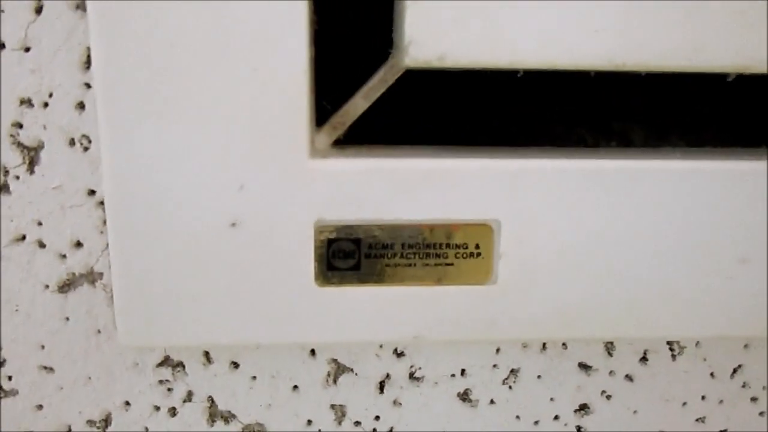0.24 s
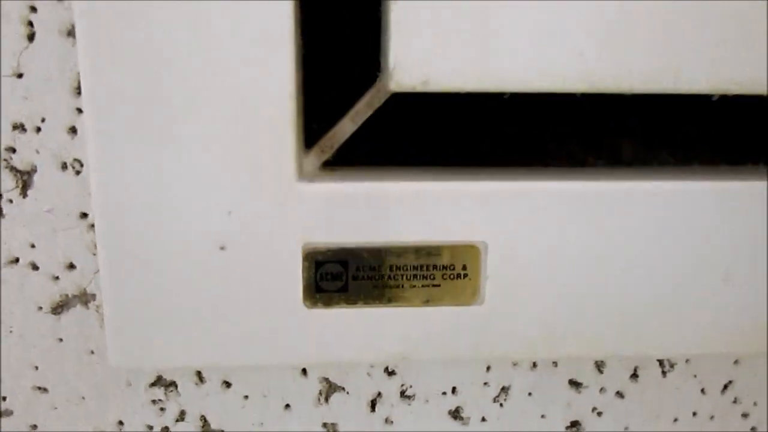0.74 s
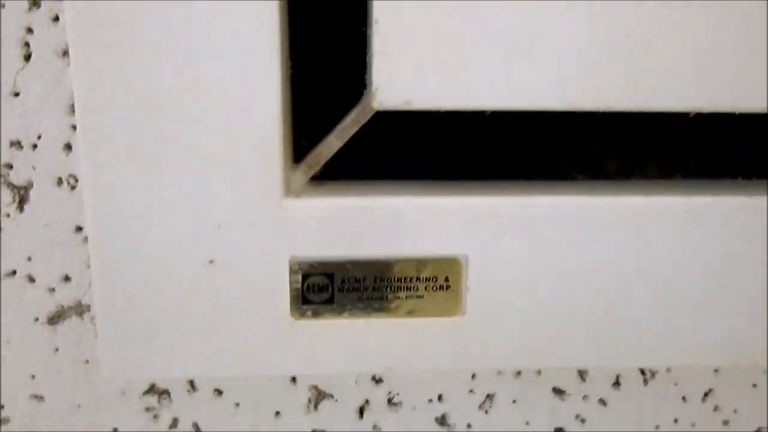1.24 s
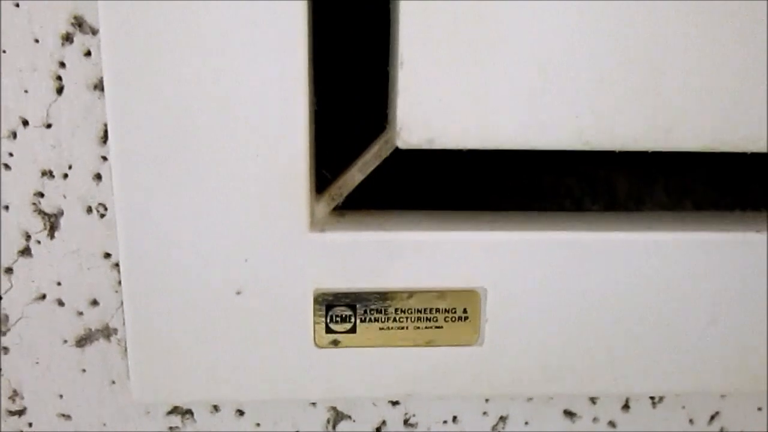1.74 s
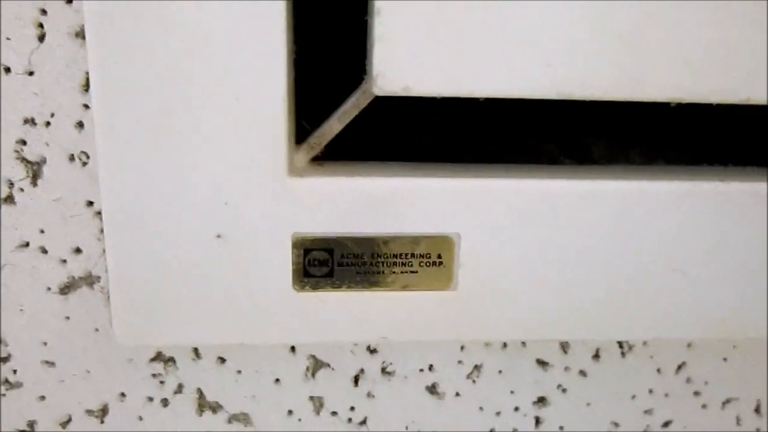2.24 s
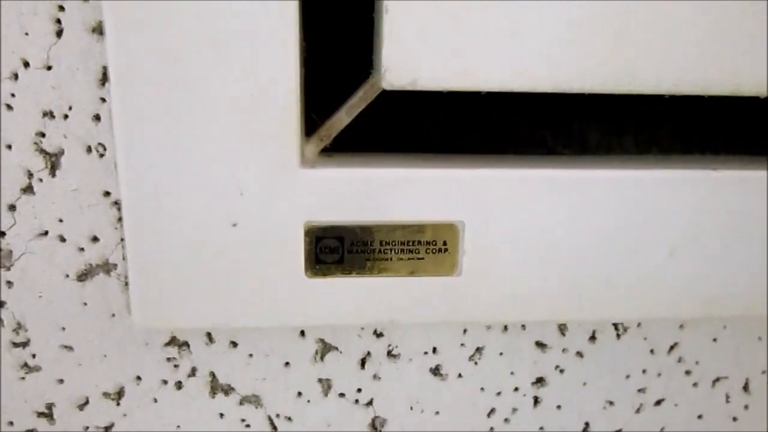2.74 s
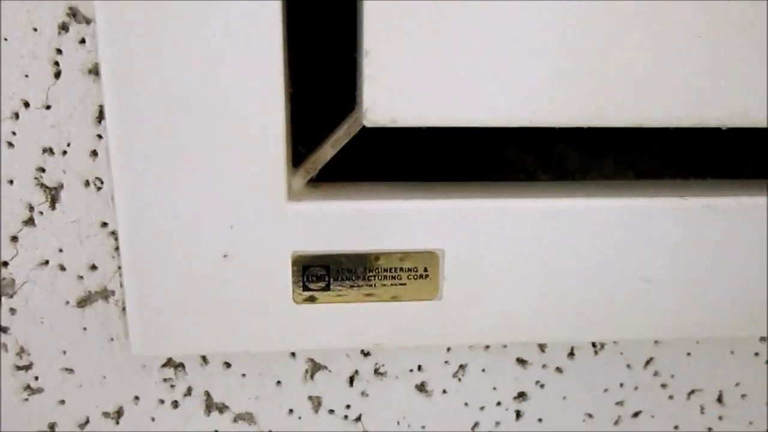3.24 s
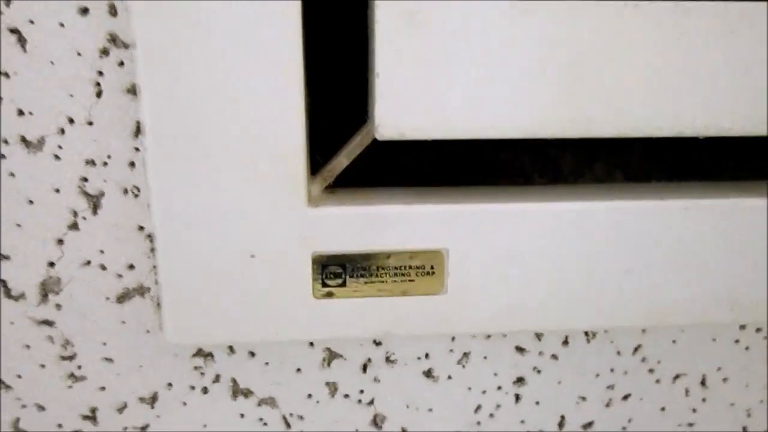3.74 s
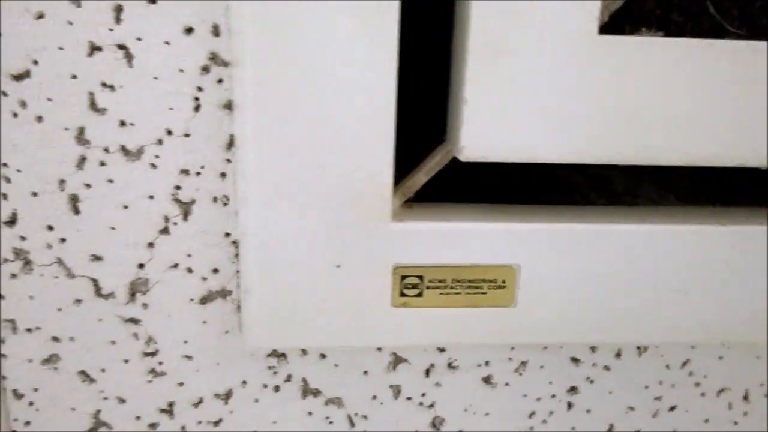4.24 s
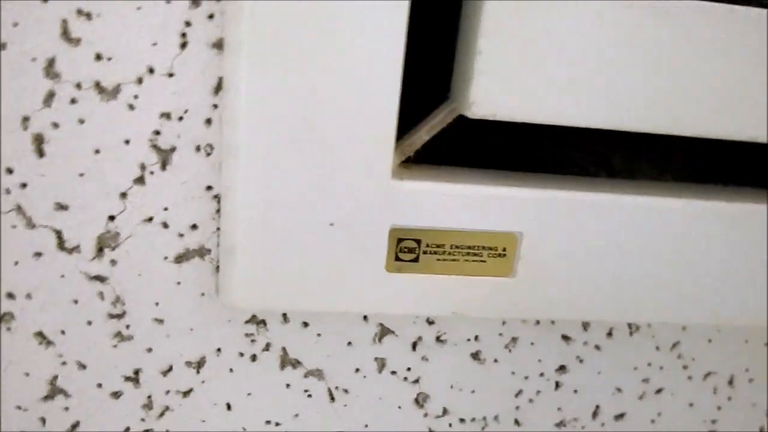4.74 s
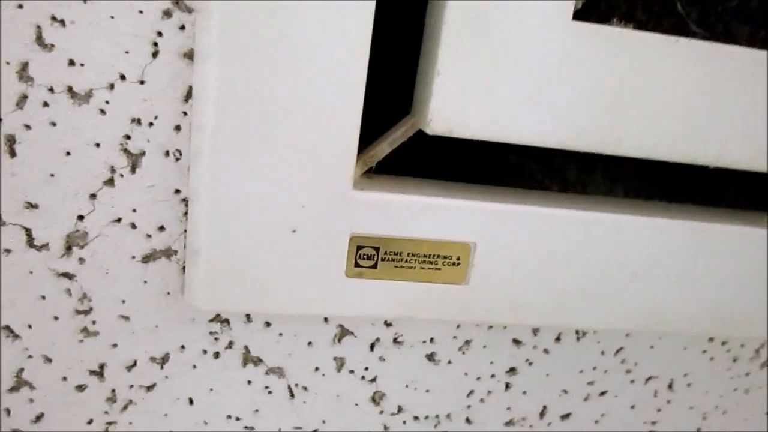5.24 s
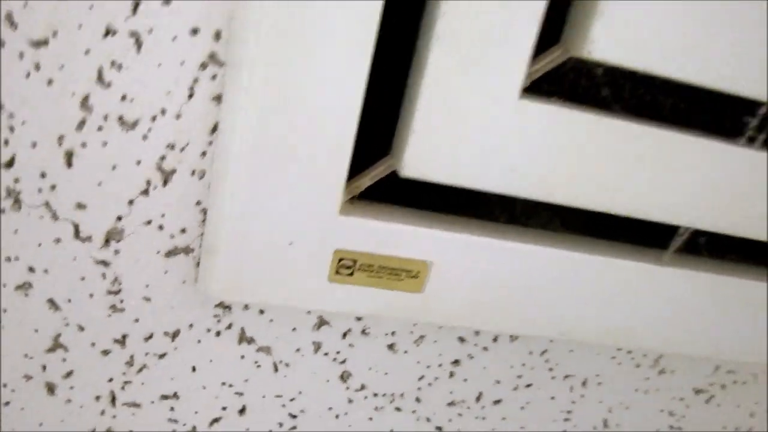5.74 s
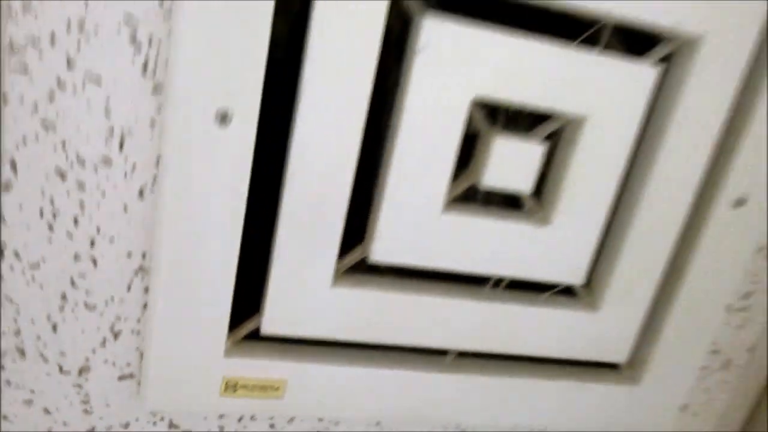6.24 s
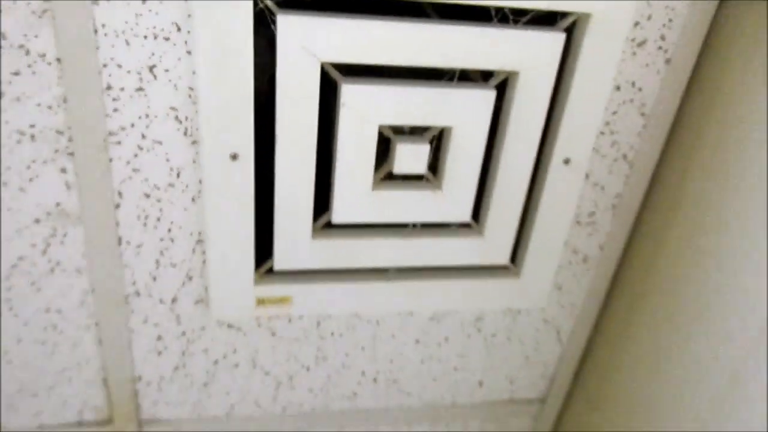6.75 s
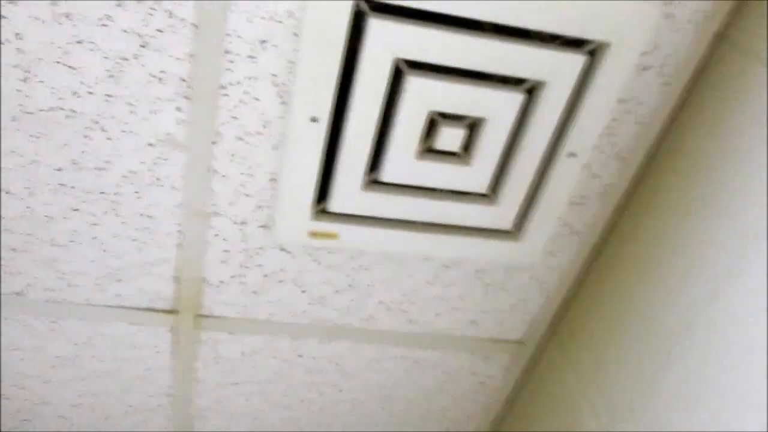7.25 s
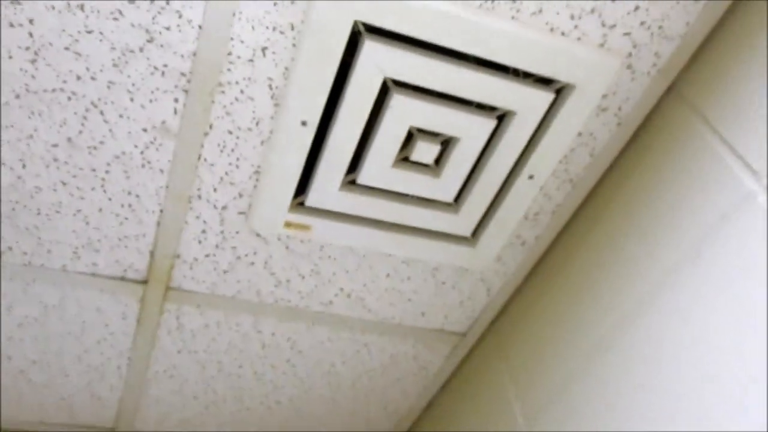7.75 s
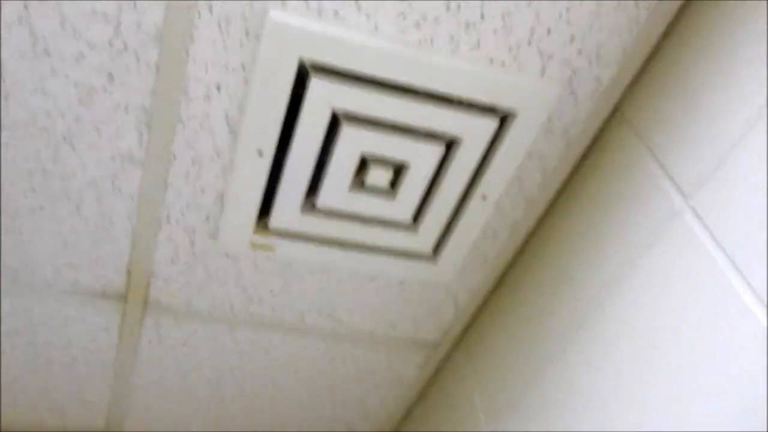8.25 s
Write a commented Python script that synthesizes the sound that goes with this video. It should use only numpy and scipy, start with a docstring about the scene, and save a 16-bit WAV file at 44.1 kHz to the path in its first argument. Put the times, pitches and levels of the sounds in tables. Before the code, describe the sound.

Steady mains-like fan drone and duct air with a light scraping flutter, briefly rougher midway, followed by bumps and sharp plastic clicks.

```python
"""Ceiling exhaust fan

A mains hum with sidebands from the turning rotor sits over filtered-noise air in the duct and grille.
A housing buzz pulses on top, and a faint noise rub swells about twice a turn and sometimes catches.
The camera backs away around six seconds: tones and noise layers shift from grille to room levels.
Fingers brush its case as shaped noise and click on it as resonant snaps.
The loudest click ducks the gain for about a second."""
import sys
import numpy as np
from scipy import signal
from scipy.fft import rfft, irfft, next_fast_len
from scipy.io import wavfile
from scipy.ndimage import uniform_filter1d, minimum_filter1d, map_coordinates

SR = 44100
rng = np.random.default_rng(int(sys.argv[2]) if len(sys.argv) > 2 else 0)


def wrap_up_sound(samples):
    """Save the sound to the file named by the first command line argument, as 16-bit audio."""
    columns = np.atleast_2d(samples).T
    # keep every value between -1 and 1, then stretch to whole-number steps
    tamed = np.clip(columns, -1, 1)
    steps = np.round(tamed * 32767).astype(np.int16)
    wavfile.write(sys.argv[1], SR, steps)


N = 374850


def amp(db):
    """Decibels to gain."""
    return 10 ** (np.asarray(db) / 20)


def unit(x):
    """Scale to rms 1."""
    return x / np.sqrt(np.mean(x ** 2) + 1e-20)


def clock():
    """The time of every sample, in seconds."""
    return np.arange(N) / SR


def curve(rows):
    """Interpolate (t/s, value) rows to one value per sample."""
    times, values = np.transpose(rows)
    return np.interp(clock(), times, values)


def wobble(rate):
    """A smooth random curve, rate knots a second."""
    knots = rng.standard_normal(1024)
    return map_coordinates(knots, [clock() * rate], mode="mirror")


def bell(x):
    """A Gaussian hump of height 1."""
    return np.exp(-.5 * x ** 2)


def shape(points, hz, tilt_db=0):
    """Gain of (f/Hz, level/dB) points on a log axis, tilted in dB per octave."""
    f, db = np.transpose(points)
    octave = np.log2(np.maximum(hz, 1))
    # the tilt pivots on the last point and stays flat below the second
    tilt = tilt_db * (np.clip(octave, np.log2(f[1]), None) - np.log2(f[-1]))
    return amp(np.interp(octave, np.log2(f), db) + tilt)


def bump(hz, centre_hz, db, octaves=0.12):
    """Gain of a broad resonance that lifts one band, or dips it if db is negative."""
    return amp(db * bell(np.log2(np.maximum(hz, 1) / centre_hz) / octaves))


def filtered(x, response):
    """Multiply the spectrum of x by a response of frequency."""
    m = next_fast_len(N + SR // 2)
    return irfft(rfft(x, m) * response(np.fft.rfftfreq(m, 1 / SR)), m)[:N]


def noise(points):
    """Coloured noise of rms 1."""
    return unit(filtered(rng.standard_normal(N), lambda hz: shape(points, hz)))


# rotor speed: t/s, f/Hz (turns per second)
ROTOR_SPEED = [(0, 25.77), (1.1, 25.77), (1.5, 25.9), (2.4, 25.88), (4, 25.84), (5, 25.81), (6.5, 25.78),
               (8.5, 25.77)]


def rotor_turns():
    """Turns completed by the rotor: its speed summed over time."""
    return np.cumsum(curve(ROTOR_SPEED)) / SR


# slow drift of the deep drone: t/s, level/dB (only the departure from its mean is used)
DRONE_DRIFT = [(0.0, -14.5), (0.04, -15), (1.16, -15), (3.73, -15.5), (5.69, -17), (7.05, -14)]


def drone_drift():
    """Slow rise and fall of the deep tones, in dB around their mean."""
    drone_db = curve(DRONE_DRIFT)
    return drone_db - drone_db.mean()


MAGNET_HZ = 120.04  # rate of the magnetic pull
# motor tones before drift and standing waves:
# multiple of the magnetic pull, added multiple of rotor speed, level/dB at the grille, level/dB in the room
MOTOR_TONES = [(0, 1, -39.5, -42), (0, 2, -44.5, -57), (0, 3, -32.5, -37), (0, 5, -63, -50),
               (0, 6, -46.5, -55), (0, 8, -40.5, -44.5), (0, 10, -47, -50), (1, -2, -46, -48),
               (1, -1, -41.5, -50.5), (1, 0, -15.5, -17), (1, 1, -35.5, -62), (1, 2, -67, -47),
               (1, 5, -44, -54), (2, -1, -42, -37), (2, 0, -27, -37), (2, 1, -33.5, -45.5),
               (2, 2, -45, -46.5), (2, 3, -37.5, -47.5), (2, 4, -47.5, -44.5), (2, 5, -44, -43.5),
               (3, -4, -38.5, -53), (3, -2, -36, -45.5), (3, -1, -39, -55), (3, 0, -45, -48),
               (3, 1, -40.5, -54), (3, 2, -41, -41.5), (4, -1, -42, -52.5), (4, 3, -48.5, -56)]
# standing waves that the camera passes on its way back: distance (0-1), f/Hz, level/dB
ROOM_WAVES = [(0.54, 312, 6.5), (0.35, 208, 1.5), (0.64, 350, -5.5)]
WAVE_REACH = .2  # spread to either side, in the same distance


def hum(turn, away, drift_db, duct_db, waver_db=0.3):
    """The magnetic pull shakes the housing; the off-centre rotor adds sidebands to each harmonic."""
    t, out = clock(), np.zeros(N)
    mid_db = duct_db + waver_db * wobble(4.5)
    waves = [(bell((away - place) / WAVE_REACH), hz, db) for place, hz, db in ROOM_WAVES]
    phases = rng.random(len(MOTOR_TONES))
    for (pull, spin, near_db, far_db), phase in zip(MOTOR_TONES, phases):
        cycles = round(pull) * MAGNET_HZ * t + round(spin) * turn
        hz = cycles[-1] / t[-1]
        tone_db = near_db + (far_db - near_db) * away
        tone_db = tone_db + (drift_db if hz < 160 else mid_db)
        for inside, wave_hz, wave_db in waves:
            tone_db = tone_db + inside * 20 * np.log10(bump(hz, wave_hz, wave_db, octaves=0.086))
        out += amp(tone_db) * np.sin(2 * np.pi * (cycles + phase))
    return np.sqrt(2) * out  # so tone levels are rms


# colour of the housing's chatter: f/Hz, relative level/dB
BUZZ_COLOUR = [(300, -40), (480, 0.5), (570, 1.5), (690, 0.5), (780, -3), (900, 2.5), (1100, -20.5),
               (1370, -1.5), (1550, -38), (1950, -4.5), (3000, -28), (6000, -49)]


def buzz(turn, sharpness=4.4, t60=0.15):
    """The housing chatters on the magnetic pulses, hardest once a turn, and rings in the duct."""
    pulses = np.maximum(np.cos(2 * np.pi * MAGNET_HZ * clock()), 0) ** 200
    blows = pulses * np.exp(sharpness * np.cos(2 * np.pi * turn))
    t = np.arange(SR // 4) / SR
    echo = rng.standard_normal(len(t)) * amp(-60 * t / t60)
    ringing = signal.fftconvolve(blows, echo)[:N]
    return unit(filtered(ringing, lambda hz: shape(BUZZ_COLOUR, hz)))


# colours of the duct up close, the room and the grille hiss: f/Hz, relative level/dB
DUCT_COLOUR = [(15, -31), (35, -10), (55, -16), (110, 1), (150, 1), (255, -2), (330, -2), (400, -16.5),
               (445, 1.5), (490, -9), (650, -0.5), (770, -9.5), (930, -12.5), (1150, -19), (2500, -55)]
ROOM_COLOUR = [(15, -23), (45, -18), (70, -9), (150, 1), (220, 4.5), (290, -5.5), (410, -7), (470, -2.5),
               (620, -6), (780, -10), (980, -10.5), (1150, -16.5), (2500, -41.5)]
HISS_COLOUR = [(300, -25), (1000, -2.5), (1350, 1.5), (1550, -1), (1930, 0), (2350, -3.5), (2750, -3),
               (3600, -7.5), (4800, -10), (7300, -17), (9500, -20), (11000, -28.5), (13000, -27),
               (15000, -33)]


def air(turn, room_share, duct_db, hiss_db, rush_db=-30, room_db=-34, grille_db=-44, throb=0.07):
    """Turbulence roars in the duct; its hiss through the grille swells slightly with each turn."""
    direct = np.sqrt(1 - room_share) * amp(rush_db) * noise(DUCT_COLOUR)
    room = np.sqrt(room_share) * amp(room_db) * noise(ROOM_COLOUR)
    hiss = noise(HISS_COLOUR) * amp(grille_db + hiss_db + 0.17 * wobble(3.6))
    return (direct + room) * amp(duct_db) + hiss * (1 + throb * np.cos(2 * np.pi * (turn - .1)))


# where the rotor touches: place in the turn (turns), width (turns), relative level/dB
RUB_CONTACTS = [(0.89, 0.041, 9.5), (1.03, .07, 5), (0.22, 0.066, 12.5), (0.31, 0.13, -23)]
# colours of the rub's four parts: f/Hz, relative level/dB
SCRAPE_COLOUR = [(700, -21), (1950, -1), (2400, -2.5), (3600, -1), (4800, -1), (5650, 3.5), (6700, 0),
                 (7250, -9), (8400, 2), (9600, -5.5), (10900, -9.5), (12100, -3), (14000, -9.5),
                 (15500, -17)]
TICK_COLOUR = [(1500, -18), (3500, -8.5), (4900, -11.5), (5400, -1), (5900, -8.5), (6400, -9), (7300, -27),
               (8400, -11), (10000, -18), (15000, -43)]
RING_COLOUR = [(3600, -33), (4150, -21), (4320, 9), (4500, -7), (5000, -32), (11300, -52), (11800, -12),
               (12200, -38)]
WHIRR_COLOUR = [(1500, -12), (1750, 8), (1960, 8), (2150, -40), (2450, -7), (2700, -3.5), (3000, -13),
                (3600, -17.5)]
# base levels of the parts: level/dB at the grille, gain/dB in the surge, loss/dB out in the room
SCRAPE_MIX = (-52.5, 2.1, 12)
TICK_MIX = (-55.5, 4.3, 18)
WHIRR_MIX = (-59.5, 14.4, 0.5)
# the thin metal's ring holds, then dies away
RING_DB, RING_FADES_AT_S, RING_FADE_DB_PER_S = -58, 3.1, 3


def rub(turn, away, chatter=0.39, tick_place=0.863, tick_width=0.037, tick_sharpness=2.1,
        ring_depth=1.0, whirr_depth=0.39, accent_db=1.6):
    """The rotor grazes about twice a turn, ticking where a touch meets a magnetic pulse; thin metal rings on."""
    lean = surge()

    def part_db(mix):
        base_db, surge_db, loss_db = mix
        return base_db + surge_db * lean - loss_db * away

    def touch(place, width):
        return bell(((turn - place + .5) % 1 - .5) / width)

    pull = np.cos(2 * np.pi * (MAGNET_HZ * clock() - .36))
    contact = sum(amp(db) * touch(place, width) for place, width, db in RUB_CONTACTS)
    pressure = contact * (1 + chatter * pull) * amp(wobble(28))
    scrape = amp(part_db(SCRAPE_MIX)) * unit(pressure) * noise(SCRAPE_COLOUR)

    tick_force = unit(touch(tick_place, tick_width) * np.exp(tick_sharpness * pull))
    tick = amp(part_db(TICK_MIX) + accent_db * wobble(26)) * tick_force * noise(TICK_COLOUR)

    swing = np.cos(2 * np.pi * (turn - .18))
    ring_db = RING_DB - RING_FADE_DB_PER_S * np.maximum(clock() - RING_FADES_AT_S, 0)
    ring = amp(ring_db) * (1 + ring_depth * swing) * noise(RING_COLOUR)
    whirr_gain = amp(part_db(WHIRR_MIX) + accent_db * wobble(26))
    whirr = whirr_gain * (1 + whirr_depth * swing) * noise(WHIRR_COLOUR)
    return scrape + tick + ring + whirr


# the rotor catches, then more lightly on the next turns: t/s, level/dB, loss per turn/dB
ROTOR_CATCHES = [(0.852, -38.5, 10), (2.949, -36.5, 7), (3.026, -38, 3), (3.374, -29.5, 3.5),
                 (4.03, -38, 5)]


def grazes(length=0.0016, count=6):
    """Now and then the rotor catches for a few milliseconds, once a turn for count turns."""
    t, catches = clock(), np.zeros(N)
    for s, db, loss_db in ROTOR_CATCHES:
        period = 1 / np.interp(s, *np.transpose(ROTOR_SPEED))
        turns = np.clip(np.round((t - s) / period), 0, count - 1)
        catches += amp(db - loss_db * turns) * bell((t - s - turns * period) / length)
    return catches * noise(SCRAPE_COLOUR)


# the rotor leans harder into its rub for a moment
SURGE_AT_S, SURGE_RISE_S, SURGE_FALL_S = 3.47, .11, .75


def surge():
    """Extra pressure on the rub, 0-1: it builds quickly and eases off slowly."""
    late = clock() - SURGE_AT_S
    return np.where(late < 0, bell(late / SURGE_RISE_S), np.exp(-np.abs(late) / SURGE_FALL_S))


# the camera backs away: t/s, distance from the grille (0-1)
CAMERA_PATH = [(0, 0), (5.85, .04), (6.65, 0.61), (7.05, 0.72), (7.35, 0.9), (8.5, 1)]


def camera_distance():
    """Distance of the camera from the grille, 0-1, which sets each layer's near and far balance."""
    return np.clip(curve(CAMERA_PATH), 0, 1)


# colour of skin on the case: f/Hz, relative level/dB
SKIN_COLOUR = [(100, -21), (600, 4), (1100, 8), (2000, 0), (4000, 1), (6000, -4), (9500, -1), (11500, -16),
               (15000, -17)]
# fingers sliding on the case: t/s, rise/s, fall/s, level/dB, rasp centre f/Hz, rasp boost/dB
FINGER_BRUSHES = [(6.085, 0.0026, 0.0043, -32, 4500, 3), (6.136, 0.017, 0.016, -31, 1160, 6.5),
                  (6.144, 0.0064, 0.0042, -21, 7840, 15), (6.405, 0.039, 0.025, -48.5, 10900, 18),
                  (6.8, 0.91, 0.82, -51, 5000, 1), (7.1, 0.017, 0.1, -46.5, 2600, 11),
                  (7.212, 0.014, 0.019, -40.5, 7060, 11), (7.256, 0.0034, 0.0032, -25, 1240, 15),
                  (7.258, 0.011, 0.017, -38, 4480, 8), (7.91, 0.033, 0.026, -47.5, 2140, 21),
                  (8.365, .04, 0.053, -50.5, 8000, 8)]
# the hand bumps the camera: t/s, half length/s, level/dB (the peak comes out 4.3 dB lower)
CAMERA_BUMPS = [(6.148, 0.002, -10), (7.257, .004, -29.5)]


def brushes(grain_db=4.5):
    """Skin drags grainily over the case; a bump pushes the microphone once down and up."""
    t, out = clock(), np.zeros(N)
    roughness = unit(uniform_filter1d(rng.standard_normal(N), size=60))
    skin = unit(amp(grain_db * roughness)) * noise(SKIN_COLOUR)
    for s, rise, fall, db, rasp_hz, rasp_db in FINGER_BRUSHES:
        stroke = bell((t - s) / np.where(t < s, rise, fall))
        out += amp(db) * stroke * unit(filtered(skin, lambda hz: bump(hz, rasp_hz, rasp_db)))
    for s, length, db in CAMERA_BUMPS:
        u = (t - s) / length
        out += amp(db) * u * bell(u)
    return out


# colour of the plastic case: f/Hz, relative level/dB
CASE_COLOUR = [(200, -26), (800, -3), (1300, 2.5), (2400, 1), (4800, -3), (8000, -5.5), (11000, -11),
               (15000, -15.5)]
# the case ticks under the grip: t/s, peak level/dB before gain control, centre f/Hz, brightness/dB per octave
CASE_CLICKS = [(6.4565, -19.5, 8000, 4), (6.542, -17, 3500, -6.5), (6.955, -5.5, 1780, 1.5),
               (7.0765, -25.5, 2800, -2), (7.1223, 3, 5100, 1), (7.2457, -19, 1700, -6),
               (7.2548, -9, 4520, 0.5), (7.3141, -1.5, 11100, 2), (7.3304, -17.5, 7500, -1),
               (7.519, -14.5, 6000, 0), (7.653, -23, 1700, -10), (7.9965, -23, 6470, 6),
               (8.369, -20.5, 5950, 1), (8.39, -19.5, 6500, 3)]


def clicks(tail_db=-16, tail_t60=0.0081, ring_db=7.0, ring_octaves=0.19):
    """Each tick is one sharp snap in the plastic, followed by a few milliseconds of rattle."""
    t, out = np.arange(2048) / SR, np.zeros(N + SR)
    hz = np.fft.rfftfreq(len(t), 1 / SR)
    causal = 1 + np.sign(np.fft.fftfreq(len(t)))
    for s, db, centre_hz, bright_db in CASE_CLICKS:
        colour = shape(CASE_COLOUR, hz, bright_db) * bump(hz, centre_hz, ring_db, ring_octaves)
        # minimum phase: the case rings only after it is struck
        case = np.exp(rfft(causal * irfft(np.log(colour))))
        snap = amp(tail_db - 60 * t / tail_t60) * rng.standard_normal(len(t))
        snap[0] = 1
        crack = irfft(rfft(snap) * case)
        out[round(s * SR):][:len(t)] += amp(db) * crack / np.abs(crack).max()
    return out[:N]


DUCT_FOLLOWS = .45  # share of the drone's drift in the duct's sound
ROOM_TAKES_OVER = 0.61  # distance at which the room has replaced the duct's direct sound
HISS_LOSS_DB = 6.5  # from the grille to out in the room
BUZZ_DB, BUZZ_LOSS_DB = -40.5, 6.5  # at the grille; lost once the room takes over


def scene():
    """The fan overhead and the hand on the camera."""
    turn = rotor_turns()
    away = camera_distance()
    room_share = np.clip(away / ROOM_TAKES_OVER, 0, 1)
    drift_db = drone_drift()
    duct_db = DUCT_FOLLOWS * drift_db
    chatter = amp(BUZZ_DB + duct_db - BUZZ_LOSS_DB * room_share) * buzz(turn)
    motor = hum(turn, away, drift_db, duct_db) + chatter + rub(turn, away) + grazes()
    airflow = air(turn, room_share, duct_db, -HISS_LOSS_DB * away)
    return (motor + airflow + brushes() + clicks())[None]


def gain_control(x, ceiling_db=-0.5, hold=0.19, recovery_db=4.5):
    """A sharp peak over the ceiling cuts the gain at once; it holds, then climbs back in dB a second."""
    sharp = x - uniform_filter1d(x, size=45)
    over = np.maximum(20 * np.log10(np.abs(sharp) + 1e-9) - ceiling_db, 0)
    span = 2 * int(hold * SR / 2) + 1
    # largest overshoot in the hold time just past
    held = -minimum_filter1d(-over, span, origin=span // 2)
    climb = recovery_db * clock()
    return x * amp(climb - np.maximum.accumulate(held + climb))


TOP_HZ = 15050  # nothing passes from here up


def record(dry):
    """The camera's gain control and band limit."""
    return filtered(gain_control(dry[0]), lambda hz: hz < TOP_HZ)[None]


dry = scene()
out = record(dry)
wrap_up_sound(out)
```